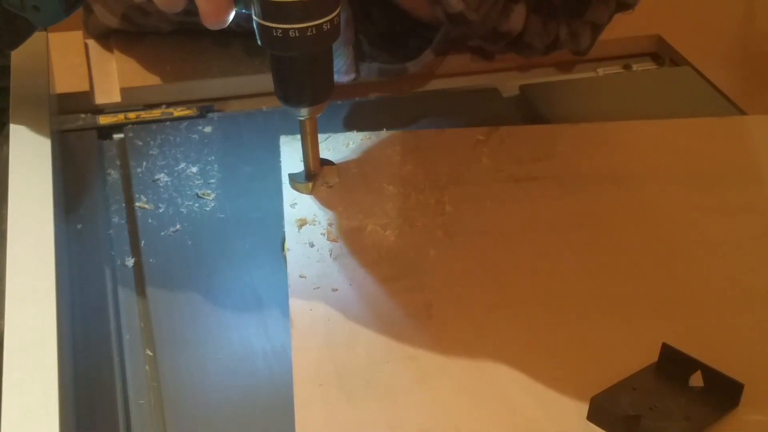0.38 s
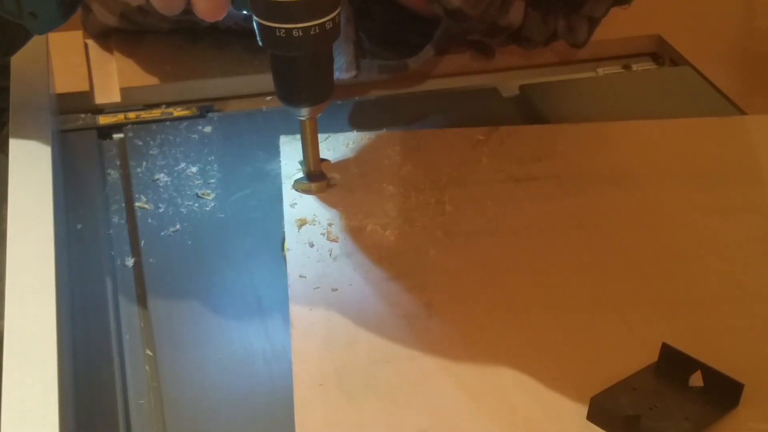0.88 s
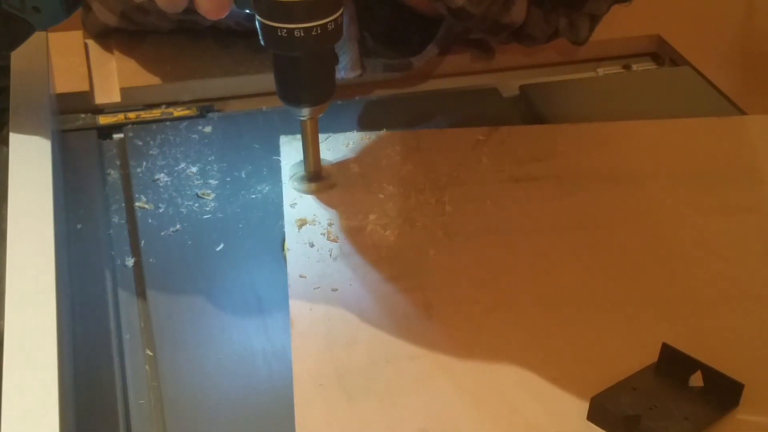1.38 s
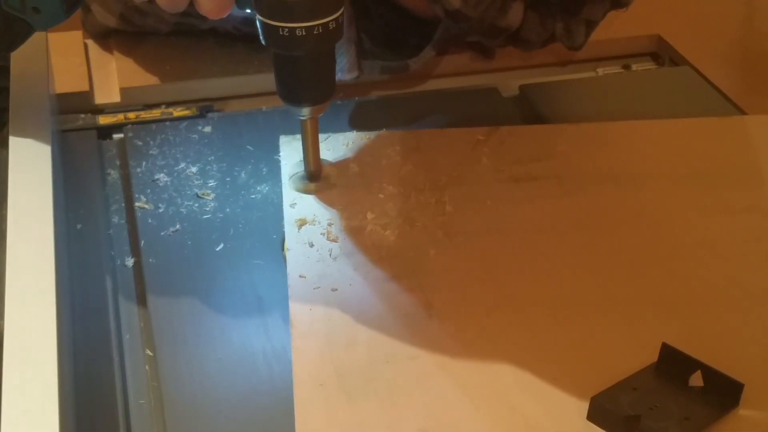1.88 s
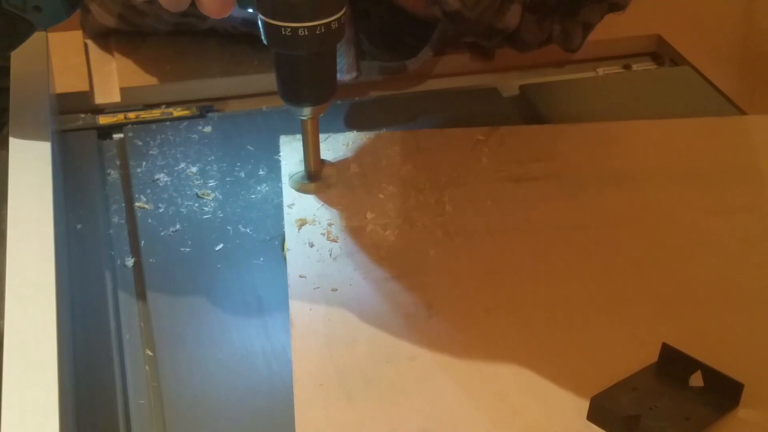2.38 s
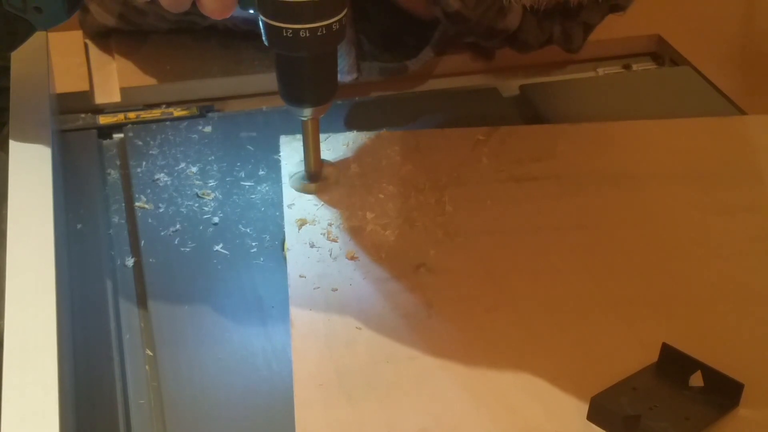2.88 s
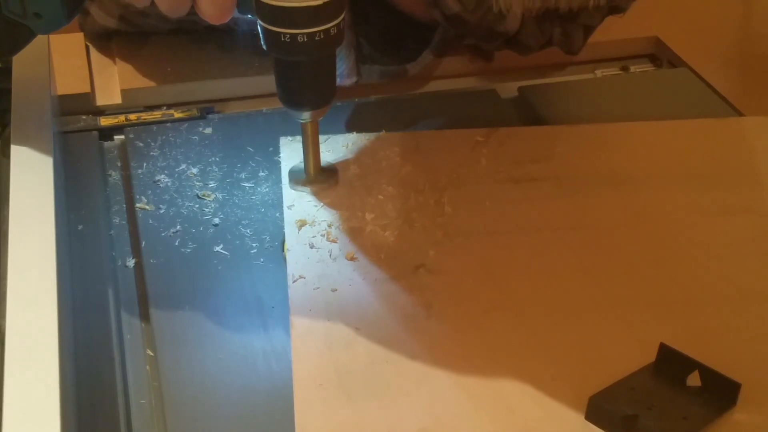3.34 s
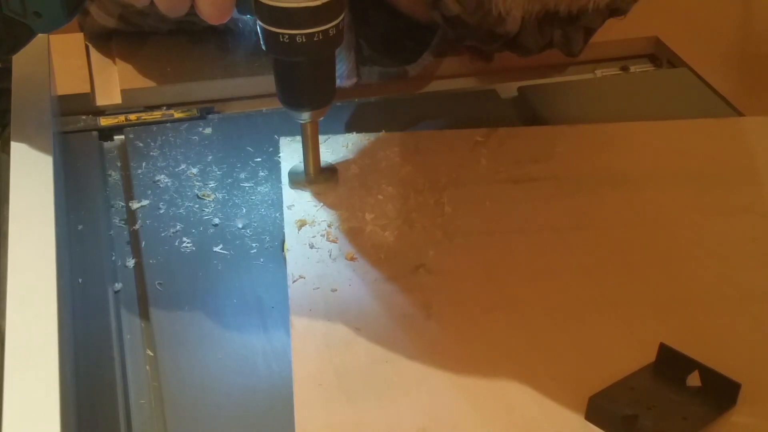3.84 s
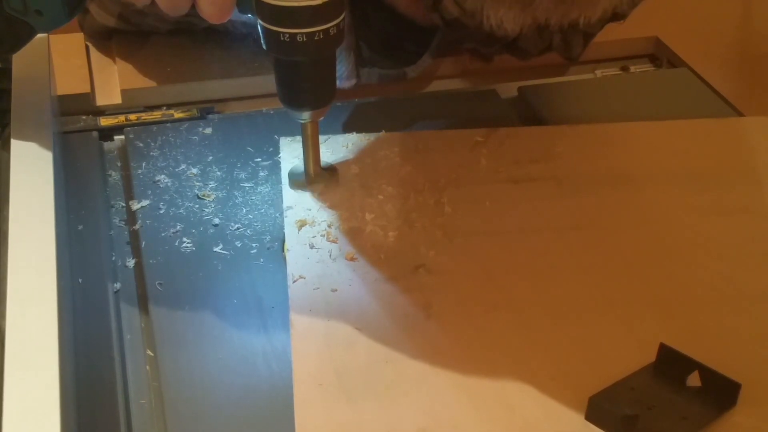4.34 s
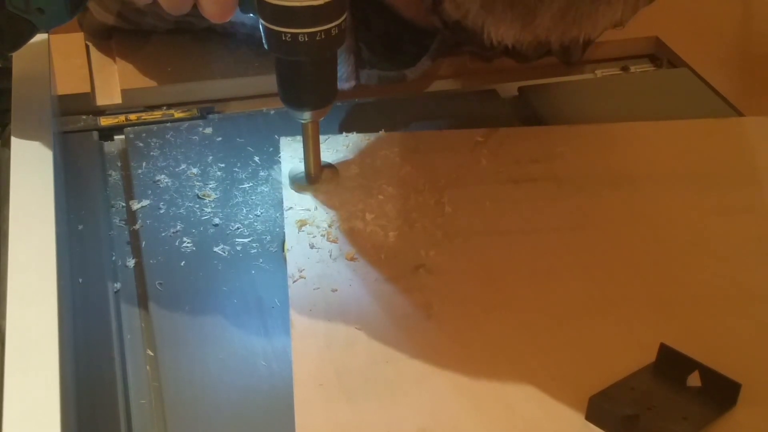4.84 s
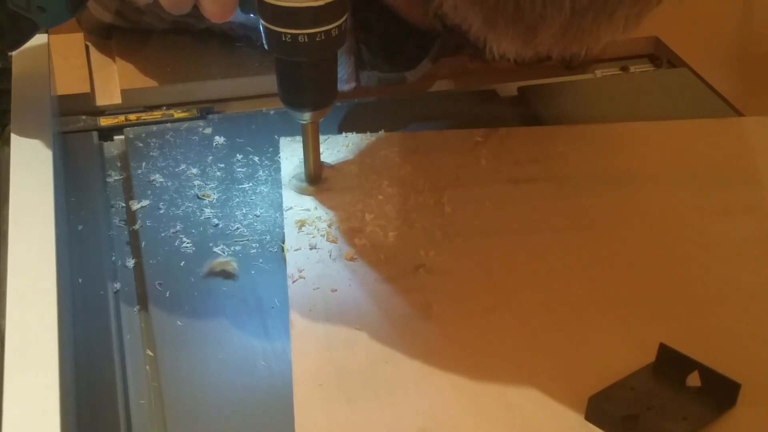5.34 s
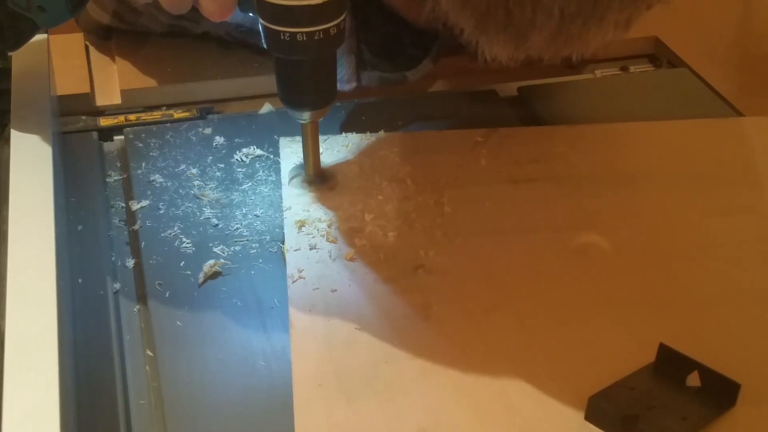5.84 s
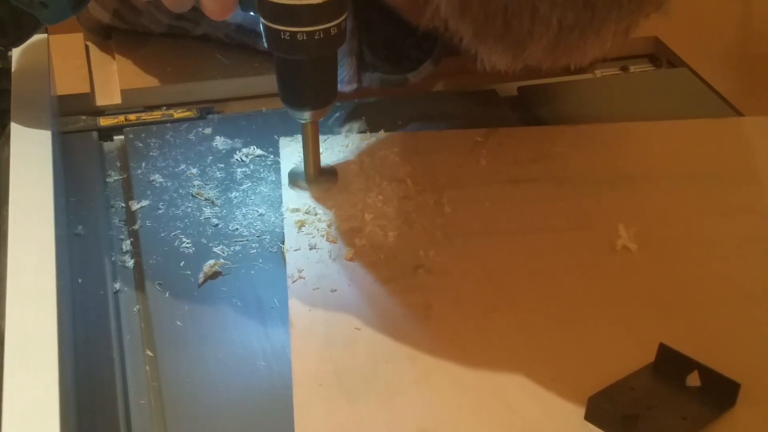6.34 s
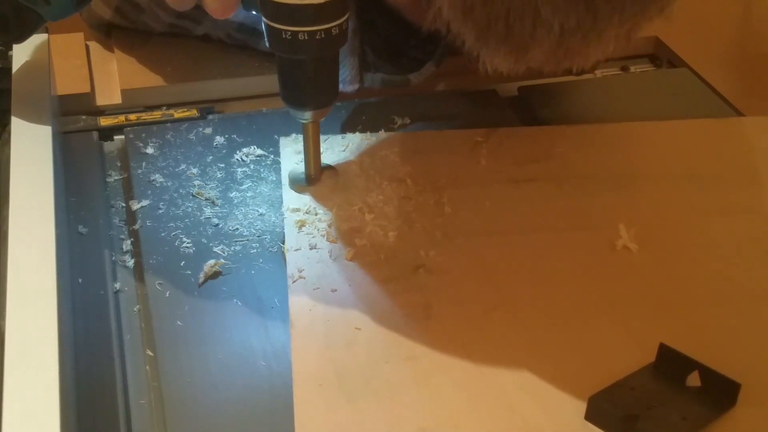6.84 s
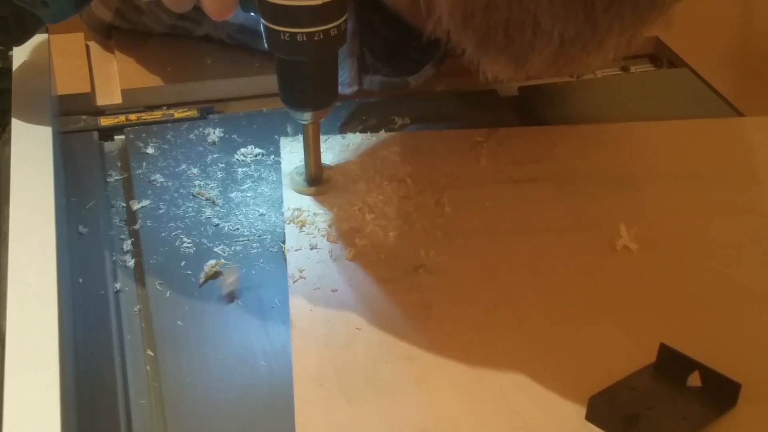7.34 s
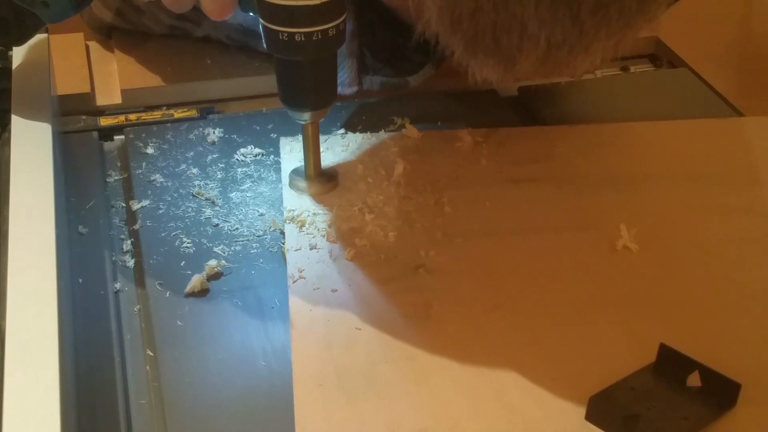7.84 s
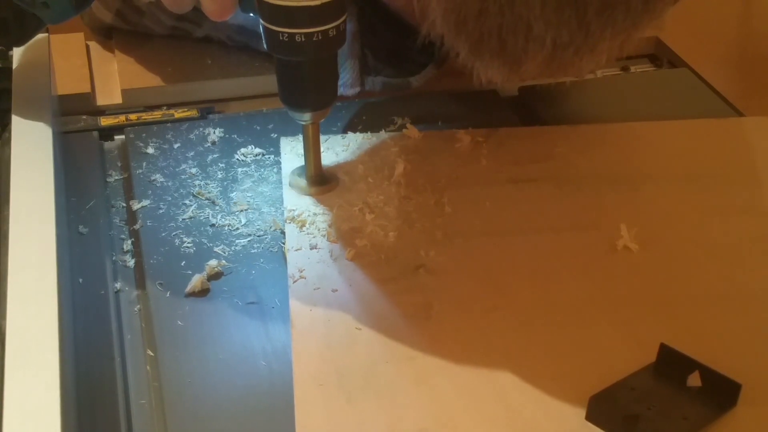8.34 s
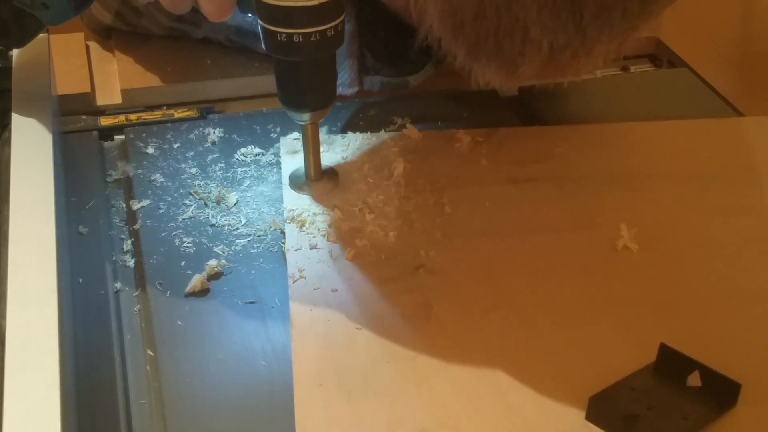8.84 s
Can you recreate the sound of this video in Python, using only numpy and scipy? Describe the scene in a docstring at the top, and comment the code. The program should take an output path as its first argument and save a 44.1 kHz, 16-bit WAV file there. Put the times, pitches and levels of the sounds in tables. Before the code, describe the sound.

For the first 0.8 seconds there is only a very quiet workshop: faint low rumble, soft hiss and a slight finger rustle on the trigger just before the drill starts. At about 0.83 seconds a cordless drill leaps up to a buzzing whine with gear noise and airy hiss, spinning freely. Around 1.1 to 1.2 seconds the bit catches a wooden board with three quick dull thumps and a crack, then skates loudly with boomy, rough rubbing until about 2.4. A sharp snap and gear jolt at 2.45 mark it settling. From then on it bores continuously, a coarse grind pulsing about sixteen times a second, fibres tearing and chips cracking, with clusters near 2.7-3.1, 6.4-8 and 8.5-8.8. The pitch sags slightly and wavers more, while a rough housing rattle grows until about 5 seconds. Still drilling at the end, near 9 seconds; close stereo, short echo.

```python
"""A quiet workshop murmurs and a finger rustles on the trigger: shaped noise and faint steady tones. A cordless
drill spins up: its whine is sine waves at multiples of the motor speed, its gears and air hiss. The bit catches
a wooden board with thumps that ring its low modes, and its rim skates loudly, then settles. As it bores a wide
hole, two cutting lips rub (repeating noise), fibres tear (dense random grains), and chips snap off (noise
bursts, the loudest also ringing the board) while the motor slowly sags."""
import sys
import numpy as np
from scipy import signal
from scipy.fft import rfft, irfft, next_fast_len
from scipy.io import wavfile

SR = 44100
rng = np.random.default_rng(int(sys.argv[2]) if len(sys.argv) > 2 else 0)


def level_to_linear(level):
    """Convert decibel levels to linear amplitude factors, elementwise."""
    exponent = np.asarray(level, float) / 20
    return 10 ** exponent


def output_pcm(signal):
    """Save a mono or channel-first signal as 16-bit PCM at the path in sys.argv[1].

    Samples are clipped to [-1, 1] before scaling.
    """
    pcm = np.clip(np.atleast_2d(signal).T, -1, 1) * 32767
    wavfile.write(sys.argv[1], SR, np.round(pcm).astype(np.int16))


N = 395136   # length in samples
BINS_HZ = np.maximum(np.arange(N // 2 + 1) * SR / N, 1)

# How sound reaches the two microphones.
# Likeness of left and right. Each row: frequency in Hz, likeness from 0 to 1.
LIKENESS = [(60, 0.97), (150, 1), (380, 0.86), (950, 0.14), (2380, 0.21), (5980, 0.017), (15000, 0.022)]
# Balance of the two sides. Each row: frequency in Hz, left minus right in dB.
LEANING = [(60, 11), (110, -1.5), (200, 0), (380, 4.5), (700, 2.5), (1290, 5.5), (2380, 7.5), (4400, 0.0),
           (8120, -0.5), (15000, 6)]
RIGHT_LAG_S = .00005   # the drill is nearer the left microphone
SHOP_T60_S, SHOP_ECHO_DB = .35, -9   # time for the echo to fall by 60 dB, and its level
# Board and housing resonances. Each row: centre in Hz, width in Hz, height in dB at full effect.
BODY = [(446, 51, 3.5), (630, 14, 6), (721.6, 16, 6.5), (940, 110, -0.5), (1410, 18, 4), (1738, 41, 5.5),
        (3950, 410, 3)]

# The quiet shop, then the finger on the trigger.
# Each row: time in seconds, rumble level in dB, hiss and rustle level in dB.
SHOP_LEVELS = [(0, -84, -77), (.15, -84, -75), (.27, -84, -77), (.33, -85, -81), (.72, -87, -87),
               (.742, -84, -86), (.748, -80, -73), (.78, -74, -71), (.81, -77, -76), (.83, -70, -66)]
# Colours of the rumble and hiss. Each row: frequency in Hz, relative level in dB per Hz.
SHOP_RUMBLE = [(20, -11), (35, -9), (50, -23), (75, -10), (100, 3), (150, -9), (220, -14)]
SHOP_HISS = [(200, -7), (290, -5), (400, -7.5), (800, -12), (1250, -13), (2400, -15.5), (4200, -18),
             (5500, -37), (9000, -33)]
# Faint steady tones. Each row: frequency in Hz, middle level in dB.
SHOP_TONES = [(75.4, -82), (296.1, -94)]
MIC_NOISE_DB = -84

# The bit first catches and jolts the board. Each row: time in seconds, strength in dB.
BITE_THUMPS = [(1.132, -37), (1.165, -33), (1.204, -38)]
# Further low modes of the board, rung by the first catches of the bit. Each row: frequency in Hz, relative
# level in dB, 60 dB decay in seconds.
THUMP_MODES = [(111, -6, 0.063), (173, -9, 0.056), (298, -13, .05), (473, -3, 0.055)]

# Colours of cooling air, gears and gear housing. Each row: frequency in Hz, relative level in dB per Hz.
AIR = [(5500, -22), (7000, -12), (7800, -4.5), (8600, -3), (10500, 0), (12200, -3), (14000, -8),
       (17000, -8)]
GEARS = [(1500, -11.5), (2300, -1.5), (3000, -1), (3900, -0.5), (4800, -3), (5600, -9), (6300, -14),
         (7000, -42), (8000, -29)]
HOUSING = [(3300, -49), (3750, 3), (3900, -13), (4050, -1), (4500, -13)]
GEAR_DB, AIR_DB = -38, -49   # base levels
# The gears take a shock. Each row: time in seconds, extra level in dB, width in seconds.
GEAR_JOLTS = [(0.85, 3, 0.018), (2.476, 6, 0.019)]
# Rough band at the housing resonance, mostly growing as the bit sinks.
# Each row: time in seconds, level in dB.
RATTLE = [(.84, -120), (.9, -67), (2.4, -56), (4.3, -49), (5.2, -45.5), (7, -47.5), (8.96, -51)]

# The rim skates loudly over the surface, then settles into the hole.
# Each row: time in seconds, board boom level in dB, lip rubbing level in dB.
SKATING = [(0.9, -58, -44.5), (1.04, -62, -54), (1.15, -40, -37), (1.3, -42.5, -43.5), (1.4, -51.5, -41.5),
           (2.13, -52.5, -45.5), (2.41, -56, -41.5), (2.46, -57, -50), (2.73, -75, -48), (3.03, -59, -48),
           (3.43, -66, -48), (3.56, -59, -49.5), (4.07, -70, -54.5), (4.4, -60, -50.5), (5.1, -62.5, -49.5),
           (5.4, -54.5, -48.5), (5.84, -64.5, -49.5), (7.15, -60.5, -47.5), (8.96, -60, -49.5)]
SKATING_UNEVEN_DB, SKATING_UNEVEN_PER_S = 1.5, 2.5
# Colours of the board boom and the lip rubbing. Each row: frequency in Hz, relative level in dB per Hz.
BOOM = [(25, -34), (45, -18), (62, -29), (80, -4.5), (95, -7.5), (112, 3.5), (140, -4), (170, -0.5),
        (210, -28)]
RUB = [(150, -19), (190, -7.5), (228, -0.5), (280, -2.5), (320, -5), (380, -7), (430, -0.5), (480, -4),
       (560, -30)]
# How far cutting effort can swell in a lip pass. Each row: time in seconds, depth in dB before chance.
BITE_DEPTH = [(1.1, 2), (5, 1.3), (7, 2.5), (8.96, 2)]
TURNS_PER_LIP = 31.75   # motor turns for half a turn of the bit

# Wood tearing. Each row: time in seconds, base level in dB.
TEARING = [(0.9, -40), (1.04, -43.5), (1.15, -37), (1.6, -40.5), (2.41, -37.5), (2.46, -39.5),
           (2.52, -38.5), (3.03, -38.5), (4.07, -41.5), (4.4, -40), (6.0, -39), (7.2, -38), (7.9, -39),
           (8.2, -37), (8.96, -38.5)]
# Colours of tearing and snapping. Each row: frequency in Hz, relative level in dB per Hz.
TEAR = [(350, -40), (430, -3.5), (560, -2), (900, 0.5), (1250, -3), (1700, -2), (2300, -11), (3500, -22),
        (6000, -14.5)]
SNAP = [(400, -26), (900, 4), (1700, 5.5), (2600, 4), (3700, -11), (6000, -25)]
# The loudest chips snapping off. Each row: time in seconds, strength in dB.
SNAPS = [(1.129, -27.5), (2.452, -23.5), (2.743, -29.5), (2.868, -26), (2.997, -27), (3.098, -36),
         (5.207, -31.5), (5.463, -38), (5.642, -36), (6.401, -29), (6.465, -32), (6.848, -30),
         (6.98, -25.5), (7.042, -28), (7.307, -27), (7.653, -28), (7.852, -30), (7.904, -33), (7.987, -31),
         (8.511, -23), (8.638, -26), (8.773, -28.5)]
# Modes that these chips ring in board and bit.
# Each row: frequency in Hz, relative level in dB, 60 dB decay in seconds.
BOARD_MODES = [(226, -18.5, 0.12), (462, -7, 0.1), (647, -14.5, 0.059), (727, -1.5, 0.1), (1415, -13, 0.16),
               (1737, -2.5, 0.061), (2644, -3, 0.04), (3900, -6, .03)]

# Motor speed: spin-up, free running at part trigger, full trigger, then a slow sag as the bit sinks.
# Each row: time in seconds, turns per second.
SPEED = [(0.83, 150), (0.85, 290), (0.875, 395), (0.897, 456), (0.92, 473), (1.09, 471), (1.12, 493),
         (1.268, 509.5), (1.52, 516), (1.93, 513.5), (2.32, 514), (2.44, 509), (2.485, 501), (2.69, 507),
         (3.2, 509), (3.66, 503.5), (3.95, 509), (4.4, 502), (4.85, 498), (5.2, 488), (5.53, 494),
         (6.39, 487.5), (6.6, 494), (6.92, 494.5), (7.1, 486), (7.35, 492), (7.45, 486), (8.66, 486),
         (8.748, 476), (8.82, 487), (8.96, 493)]
# Speed waver, mostly wider as the hole deepens. Each row: time in seconds, spread in turns per second.
WAVER = [(1.1, 0.33), (2.4, 0.81), (5, 1.7), (7, 2.31), (8.96, 2.22)]
WAVER_PER_S = 9.0
START_S, START_RISE_S = 0.815, 0.05   # the trigger closes and the drill noise swells
# Each whine line is strong at the speeds where the housing passes it on.
# Each row: motor speed in turns per second, then levels in dB of the rotor, its 2nd multiple,
# the commutator, its 2nd multiple, the gear mesh and the fan blades.
WHINE = [(180, -86, -86, -92, -91, -91, -92), (304, -66, -80, -48, -52, -70, -75),
         (356, -64, -80, -53, -34, -67, -75), (450, -40, -68, -40, -42, -49, -56),
         (469, -44, -55, -51, -57, -45.5, -52.5), (485.3, -51.5, -59.5, -48.5, -46, -47, -56),
         (493.7, -45.5, -59, -40, -49, -48.5, -55.5), (499.3, -39.5, -54, -41, -54, -45.5, -56.5),
         (507.6, -43, -52, -43, -51.5, -43, -50), (513.4, -41.5, -49.5, -40, -50, -49, -52)]
# Sine waves of the whine. Each row: multiple of motor speed, WHINE level to use (0 is the rotor),
# level against it in dB, left minus right in dB, lead of the left side in radians.
PARTIALS = [(1, 0, 0, .7, .2), (2, 1, 0, 6, -.2), (4, 2, 0, 7.5, 1), (8, 3, 0, 0, .7), (23, 5, 0, 5, .6),
            (32 / 3, 4, 0, -2, .8), (29 / 3, 4, -10, 2, 1), (35 / 3, 4, -17, -9, 1.7),
            (34 / 3, 4, -16, -6, .8), (25 / 3, 4, -17, 1, 1), (26 / 3, 4, -17, 0, 1.2),
            (12, 4, -23, -9, .7)]
# Flutter of each WHINE level, in the same order. Each row: depth in dB, rate per second.
FLUTTER = [(2, 20), (4.5, 25), (3, 25), (4, 30), (4.5, 45), (3, 30)]
# Low hum while the bit spins before it bites. Each row: time in seconds, frequency in Hz, middle level in dB.
IDLE_HUM = [(.84, 150, -130), (.86, 160, -65), (.885, 172, -48), (1.09, 176, -48), (1.13, 180, -70),
            (1.15, 180, -130)]


def rms_one(x):
    """Scale to unit rms."""
    return x / np.sqrt(np.mean(x ** 2) + 1e-20)


def in_time(rows):
    """Columns of a table as curves at every sample."""
    s, *columns = np.transpose(rows)
    return [np.interp(np.arange(N) / SR, s, c) for c in columns]


def in_hz(points):
    """A spectrum read at every FFT bin, on a log-frequency axis."""
    hz, value = np.transpose(points)
    return np.interp(np.log(BINS_HZ), np.log(np.maximum(hz, 1)), value)


def drift(rate):
    """Slow random wandering of spread 1, made at every 40th sample and joined by straight lines."""
    r = np.exp(-80 * np.pi * rate / SR)
    noise = rng.standard_normal(N // 40 + 2002)
    slow = signal.lfilter([1], [1, -2 * r, r * r], noise)[2000:]
    return np.interp(np.arange(N) / 40, np.arange(len(slow)), rms_one(slow))


def dying(hits, decay_s):
    """Each hit starts an exponential decay."""
    return signal.lfilter([1], [1, -np.exp(-1 / (decay_s * SR))], hits + 1e-18)


def ringing(blows, hz, t60_s):
    """A mode rings as a decaying sine wave after each blow."""
    r = level_to_linear(-60 / (t60_s * SR))
    w = 2 * np.pi * hz / SR
    return signal.lfilter([0, np.sin(w)], [1, -2 * r * np.cos(w), r * r], blows + 1e-18)


def coloured(sources, spectrum, body):
    """Shapes three sources (shared, left, right) by spectrum and resonances into a stereo pair of rms 1."""
    hz, db = np.transpose(spectrum)
    # fall by 40 dB in the octave beyond each end
    shape_db = in_hz([(hz[0] / 2, db[0] - 40), *spectrum, (hz[-1] * 2, db[-1] - 40)])
    for centre_hz, width_hz, peak_db in BODY:
        shape_db = shape_db + body * peak_db / (1 + (2 * (BINS_HZ - centre_hz) / width_hz) ** 2)
    alike = np.clip(in_hz(LIKENESS), 0, 1)
    shared, *own = rfft(sources)
    lag = np.exp(-2j * np.pi * BINS_HZ * [[0], [RIGHT_LAG_S]])
    pair = np.sqrt(alike) * shared * lag + np.sqrt(1 - alike) * np.array(own)
    return rms_one(irfft(pair * level_to_linear(shape_db + in_hz(LEANING) * [[.5], [-.5]]), N))


def shop_echo(x):
    """Walls send sound back and forth: eight feedback delays a side, worked out on a padded FFT grid."""
    size = next_fast_len(N + SR)
    w = 2 * np.pi * np.arange(size // 2 + 1) / size
    lags = (rng.uniform(.02, .05, (2, 8)) * SR).astype(int)
    walls = []
    for side in lags:
        loops = [1 / (1 - level_to_linear(-60 * d / SR / SHOP_T60_S) * np.exp(-1j * w * d)) - 1 for d in side]
        walls.append(sum(loops))
    return irfft(rfft(x, size) * np.array(walls), size)[:, :N] / np.sqrt(8)


def shop():
    """Faint rumble, hiss and tones, the rustle of the finger on the trigger, and microphone noise."""
    rumble_db, hiss_db = in_time(SHOP_LEVELS)
    rumble = coloured(rng.standard_normal((3, N)), SHOP_RUMBLE, body=0)
    air = coloured(rng.standard_normal((3, N)), SHOP_HISS, body=0)
    t = np.arange(N) / SR
    tones = np.zeros(N)
    for hz, db in SHOP_TONES:
        strength = np.sqrt(2) * level_to_linear(db + 3.3 * drift(6))
        tones += strength * np.sin(2 * np.pi * hz * t + 0.46 * drift(8))
    mic_noise = level_to_linear(MIC_NOISE_DB) * rng.standard_normal((2, N))
    return level_to_linear(rumble_db) * rumble + level_to_linear(hiss_db) * air + tones + mic_noise


def thumps():
    """Low board modes rung by the first catches of the bit, each in a slightly different mixture."""
    out = np.zeros(N)
    share_db = rng.normal(0, 0.95, (len(BITE_THUMPS), len(THUMP_MODES)))
    at_s, db = np.transpose(BITE_THUMPS)
    for k, (hz, level_db, t60_s) in enumerate(THUMP_MODES):
        blows = np.zeros(N)
        blows[(at_s * SR).astype(int)] = level_to_linear(db + level_db + share_db[:, k])
        out += ringing(blows, hz, t60_s)
    return signal.sosfilt(signal.butter(4, 80, "high", fs=SR, output="sos"), out)


def hiss(spectrum, turns, pulse, patchy_db):
    """Air or gear noise that throbs once per motor turn and flickers a little."""
    throb = (1 + pulse * np.cos(2 * np.pi * turns)) * level_to_linear(patchy_db * drift(25))
    return coloured(rng.standard_normal((3, N)) * throb, spectrum, body=0.45)


def rubbing(lips, spectrum, memory, fresh):
    """Each lip meets nearly the bumps that the last one left: a noise pattern repeats, slowly renewed."""
    keep = np.clip(memory, 0, .98)
    new_bumps = rng.standard_normal((3, 200, 128))   # 200 passes of 128 bumps
    bumps = signal.lfilter([np.sqrt(1 - keep ** 2)], [1, -keep], new_bumps, axis=1)
    row = 30 + lips.astype(int)   # skip the passes before the pattern has built up
    at = (lips % 1 * 128).astype(int)
    touch = np.diff(at, prepend=0) != 0   # one click as each bump is reached
    contact = rms_one(bumps[:, row, at] * touch) + fresh * rng.standard_normal((3, N))
    return coloured(contact, spectrum, body=1.0)


def bite(lips, depth_db, start):
    """Cutting effort swells once per lip, by a new amount each pass."""
    strength = rng.uniform(0.083, 1.04, 200)[(lips - start + .5).astype(int) + 1]
    swell = .5 + .5 * np.cos(2 * np.pi * (lips - start))
    return level_to_linear(depth_db * strength * swell ** 2)


def tearing(per_s, spread_db):
    """Fibres break as dense grains of uneven size that ring the board."""
    uneven = level_to_linear(spread_db * np.minimum(rng.exponential(1, (3, N)), 2.5))
    sizes = uneven * rng.standard_normal((3, N))
    return coloured(sizes * (rng.random(N) < per_s / SR), TEAR, body=1.0)


def snaps(tear_db, per_s, small_db):
    """Chips break away in noise bursts: small ones at random, the loudest also knocking the board modes."""
    small_size = level_to_linear(tear_db + small_db + 2.1 * np.minimum(rng.exponential(1, N), 3))
    small = (rng.random(N) < per_s / SR) * small_size
    at = [round(s * SR) for s, db in SNAPS]
    size = level_to_linear(np.array(SNAPS)[:, 1])
    hits, knock = np.zeros(N), np.zeros(N)
    hits[at] = size * level_to_linear(-9)
    share_db = rng.normal(0, 5.3, (len(SNAPS), len(BOARD_MODES)))   # each chip rings its own mixture
    for k, (hz, level_db, t60_s) in enumerate(BOARD_MODES):
        blows = np.zeros(N)
        blows[at] = size * level_to_linear(level_db - 11.0 + share_db[:, k])
        knock += ringing(blows, hz, t60_s)
    envelope = dying(small, .006) + dying(hits, .016)
    burst = envelope * coloured(rng.standard_normal((3, N)), SNAP, body=0.58)
    # a chip is too light to move the whole board
    no_thump = signal.butter(4, 170, "high", fs=SR, output="sos")
    return signal.sosfilt(no_thump, burst + knock * level_to_linear([[1.5], [-1.5]]))


def whine(speed_hz, turns):
    """Sine waves locked to the motor flutter in strength, and the walls make them fade in and out."""
    at_hz, *columns = np.transpose(WHINE)
    levels_db = [np.interp(speed_hz, at_hz, c) for c in columns]
    out = np.zeros((2, N))
    for multiple, column, rel_db, pan_db, lead in PARTIALS:
        depth_db, rate = FLUTTER[column]
        flutter = rms_one(level_to_linear(depth_db * np.minimum(drift(rate), 1.3)))
        # bearing play blurs the lines, the commutator's 2nd multiple (column 3) most
        blur = 0.11 * np.sqrt(multiple) * drift(9.1) + (column == 3) * 0.79 * drift(41.0)
        phase = 2 * np.pi * multiple * turns + blur
        sides = level_to_linear(levels_db[column] + rel_db + pan_db * np.array([[.5], [-.5]]))
        out += np.sqrt(2) * flutter * sides * np.sin(phase + [[lead], [0]])
    hum_hz, hum_db = in_time(IDLE_HUM)
    hum_phase = 2 * np.pi * np.cumsum(hum_hz) / SR + 0.6 * drift(9)
    out += np.sqrt(2) * level_to_linear(hum_db + 3.5 * drift(20)) * np.sin(hum_phase)
    return out + level_to_linear(SHOP_ECHO_DB) * shop_echo(out)


def scene():
    """All sources at the two microphones."""
    t = np.arange(N) / SR
    speed_hz, = in_time(SPEED)
    wavering_hz = speed_hz + in_time(WAVER)[0] * drift(WAVER_PER_S)
    turns = np.cumsum(wavering_hz * (t > .83)) / SR   # the motor stands still until 0.83 s
    lips = turns / TURNS_PER_LIP
    running = np.clip((t - START_S) / START_RISE_S, 0, 1) ** 1.95
    rushing = running * (speed_hz / speed_hz.max()) ** 1.1   # louder at higher speed

    boom_db, rub_db = in_time(SKATING) + SKATING_UNEVEN_DB * drift(SKATING_UNEVEN_PER_S)
    tear_db, = in_time(TEARING)
    rattle_db, = in_time(RATTLE)
    gear_db = GEAR_DB + sum(db * np.exp(-((t - s) / width_s) ** 2) for s, db, width_s in GEAR_JOLTS)
    effort = bite(lips, depth_db=in_time(BITE_DEPTH)[0], start=0.22)

    air = level_to_linear(AIR_DB) * hiss(AIR, turns, pulse=0.13, patchy_db=0.47)
    gears = level_to_linear(gear_db) * effort ** 0.17 * hiss(GEARS, turns, pulse=0.15, patchy_db=0.7)
    gears += level_to_linear(rattle_db) * hiss(HOUSING, turns, pulse=.2, patchy_db=1.5)
    board = level_to_linear(boom_db) * rubbing(lips, BOOM, memory=0.65, fresh=0.6)
    board += level_to_linear(rub_db) * rubbing(lips, RUB, memory=0.73, fresh=0.67)
    wood = level_to_linear(tear_db) * effort * tearing(per_s=6000, spread_db=2.1)
    wood += snaps(tear_db, per_s=10.0, small_db=-10.0)
    return shop() + thumps() + running * gears + rushing * (board + wood + air) + whine(speed_hz, turns)


def low_pass(x):
    """Removes everything above the highest recorded frequency."""
    return signal.sosfilt(signal.butter(12, 16060, fs=SR, output="sos"), x)


def record(dry):
    """The top is cut steeply above 15850 Hz to finish the mix."""
    top_cut = signal.ellip(12, .3, 70, 15850, fs=SR, output="sos")
    mix = signal.sosfilt(top_cut, dry)
    return low_pass(mix)


dry = scene()
out = record(dry)
output_pcm(out)
```